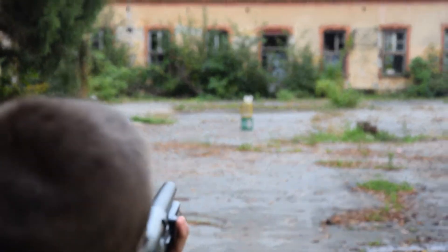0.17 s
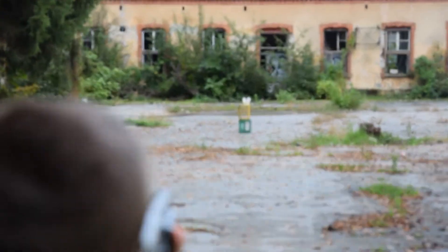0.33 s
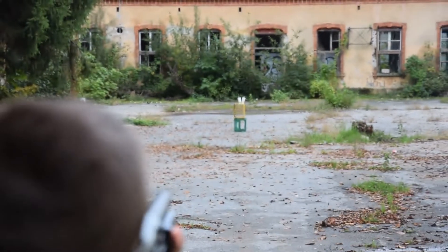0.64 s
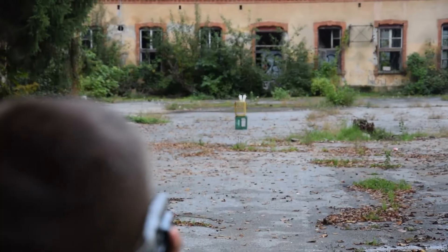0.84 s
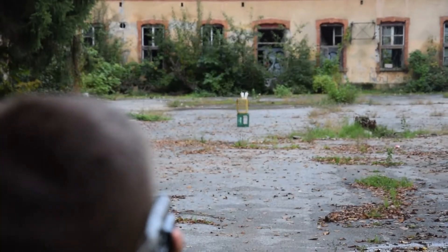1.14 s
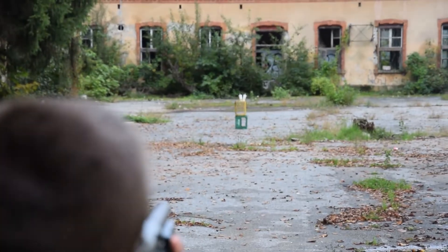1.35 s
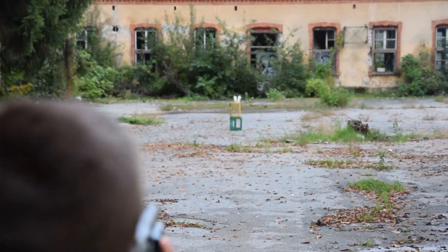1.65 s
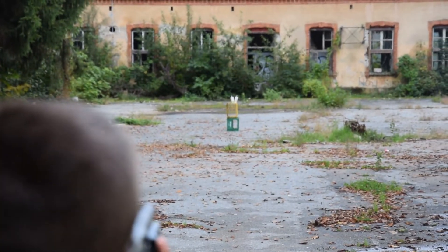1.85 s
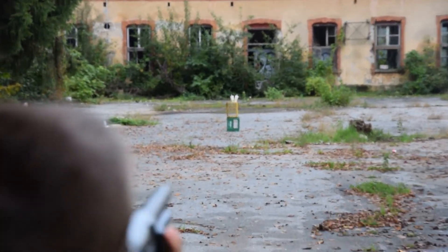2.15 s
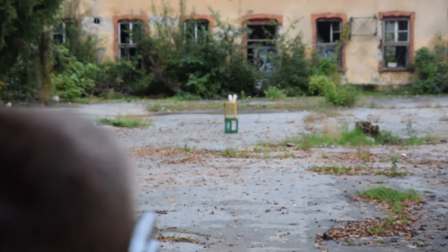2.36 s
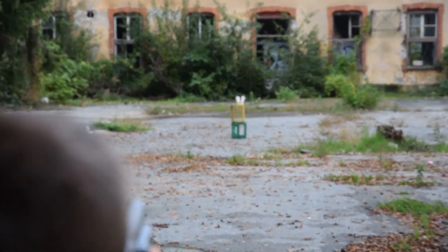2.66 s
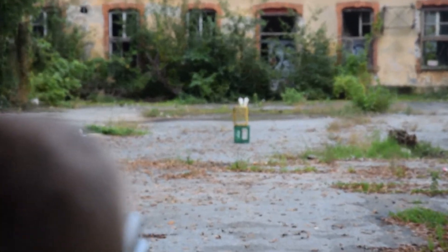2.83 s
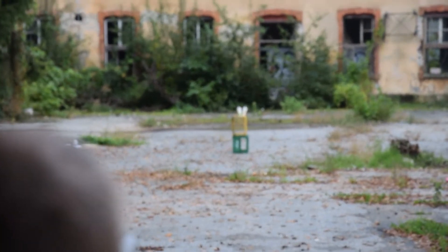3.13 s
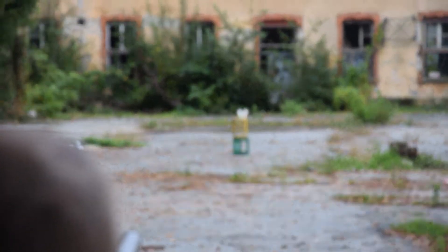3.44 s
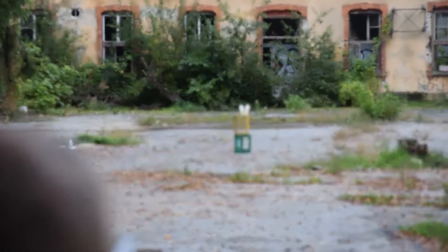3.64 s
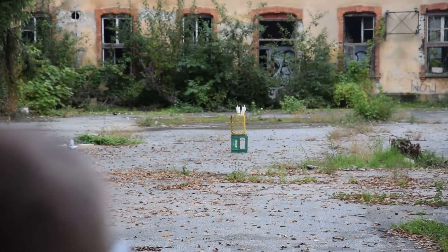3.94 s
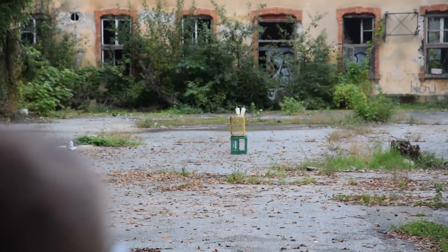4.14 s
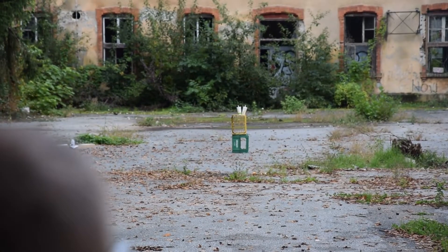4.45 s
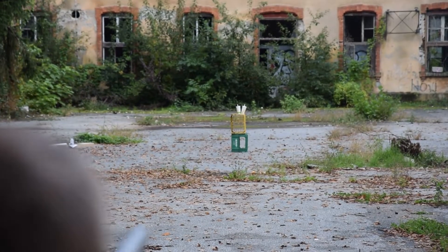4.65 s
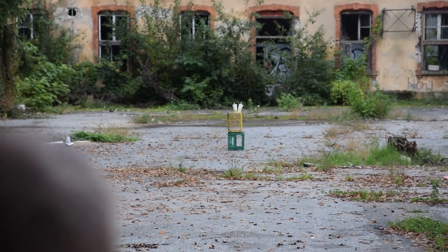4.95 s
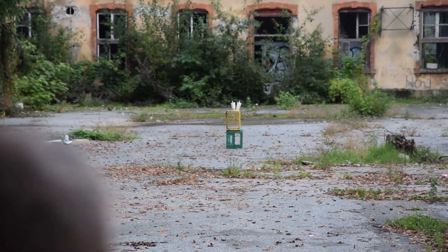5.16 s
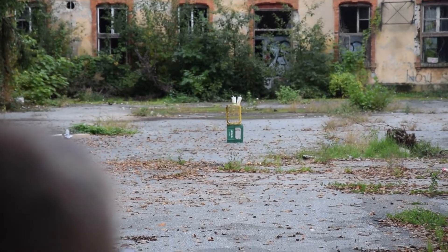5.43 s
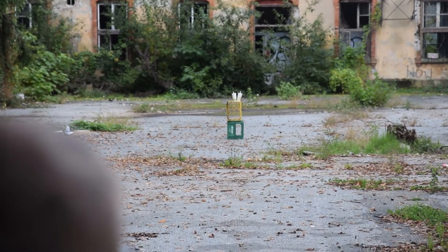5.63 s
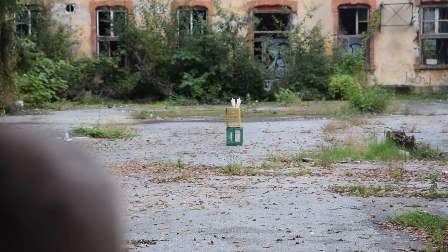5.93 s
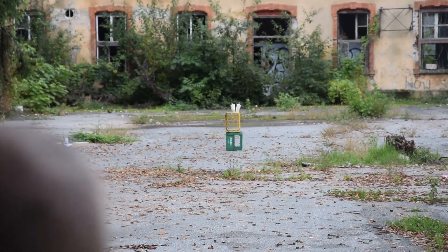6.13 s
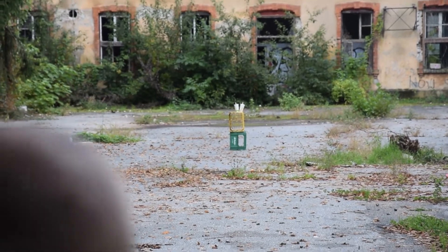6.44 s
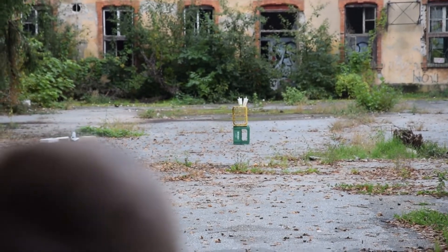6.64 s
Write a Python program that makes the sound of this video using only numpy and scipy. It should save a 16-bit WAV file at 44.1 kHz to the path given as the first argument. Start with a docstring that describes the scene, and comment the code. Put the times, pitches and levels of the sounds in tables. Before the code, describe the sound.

Close camera focus whirring and ticking, then a sharp air gun slam echoing off walls, slide racked back and forward, repeated to three shots.

```python
"""Spring shotgun in a walled yard

A spring airsoft shotgun fires three times in a paved yard between old buildings; its pump is racked twice.
Each shot is a short rush of filtered noise, then a slam of ringing body modes and noise bursts that overloads
the microphone and comes back off the walls. Racking is gritty noise bursts through the slide's resonances.
Dry and close, a focus motor whirrs and ticks through the lens barrel's resonances, over a faint wavering hum.
"""
import sys
import numpy as np
from scipy import signal
from scipy.fft import rfft, irfft
from scipy.io import wavfile

SR = 44100
rng = np.random.default_rng(int(sys.argv[2]) if len(sys.argv) > 2 else 0)


def int16_out(signal):
    """Quantize to a 16-bit WAV file."""
    q = np.round(np.clip(np.atleast_2d(signal).T, -1, 1) * 32767)
    wavfile.write(sys.argv[1], SR, q.astype(np.int16))


N = 299248
T = np.arange(N) / SR   # time in seconds

# Still air and microphone hiss, spectrum: pitch_hz, level_db (per Hz)
AIR_SPECTRUM = [(20, -13.5), (75, 0.5), (140, -3.5), (400, -7.5), (800, -10), (1400, -8), (2600, -17),
                (5000, -19.5), (6600, -20.5), (8500, -32.5), (11000, -41.5), (15000, -41)]
# Steady purr of the camera, resonances: pitch_hz, width_hz, level_db
PURR_MODES = [(201.2, 15, 3.5), (298.6, 16.6, 0.5), (3845, 304, -3), (4143, 106, -7.5), (5340, 200, -11),
              (6120, 290, -12.5)]
# Faint hum, resonances: pitch_hz, width_hz, level_db
HUM_MODES = [(557.3, 48, 4), (960, 190, -1)]
# How the hum wavers: time_s, level_db
HUM_WAVER = [(0, -48), (.58, -57.5), (.76, -48), (1.25, -53.5), (2.2, -53.5), (3.1, -99), (3.6, -52),
             (4.3, -65), (5.2, -48.5), (6.15, -53.5), (6.36, -49.5), (6.79, -57)]
# Diffuse sound of the yard: pitch_hz, level_db, t60_s
YARD_DECAY = [(99, -13.5, 1.02), (247, -12.5, 1.72), (500, 6, 0.66), (1000, -1.5, 0.96), (1960, 3, 1.116),
              (3900, 1.5, 0.83), (6780, 8, 0.62), (9900, 3, 0.44), (14900, 4.5, .36)]
# Echoes off the walls: delay_s, level_db, t60_s
WALL_ECHOES = [(0.1027, 2.5, .03), (.13, -0.5, 0.094), (.207, -10.5, 0.08), (0.294, -10.5, 0.32),
               (.44, -7, .13), (0.469, -9, 0.22)]
# Lens barrel, resonances: pitch_hz, width_hz, level_db
LENS_MODES = [(1060, 180, -20), (1750, 520, -8), (2720, 220, -9), (3310, 200, -2), (3687, 200, 11.5),
              (4000, 100, 14.5), (4070, 80, -17), (5190, 120, 3), (6230, 220, -3.5), (6930, 110, -3)]
# The lens moves: start_s, engage_s (gears), stop_s, running_db, stop_click_db, loss_db (per bounce);
# the last three are settings before trims and resonances
LENS_MOVES = [(-.006, .03, .124, -44, -19, 1), (.1717, .214, .3432, -40, -13, 7),
              (.4072, .4538, .5828, -42.5, -19.5, 0), (.6527, .683, .683, -43.5, -24.5, 14),
              (3.3307, 3.36, 3.4145, -43.5, -21.5, 0), (3.4748, 3.521, 3.6529, -44, -22, 7)]
# Single twitches of the lens: start_s, level_db, t60_s
LENS_TWITCHES = [(2.0718, -13, 0.0073), (3.8454, -23, 0.018), (3.853, -19.5, 0.043)]
# What the slide rings with: pitch_hz, width_hz, level_db
SLIDE_MODES = [(232, 66, -1), (367, 160, -2), (668, 56, 2.5), (780, 144, 11), (1097, 280, -3.5),
               (1497, 400, 7), (2220, 490, -0.5), (3180, 1050, -3), (4090, 270, -0.5), (4820, 180, -1.5),
               (5710, 571, 0), (6650, 350, 1), (7200, 380, -1)]
# The slide is pulled back: stop_s, travel_s, level_db
PULL_STROKES = [(2.1874, .061, -13), (4.6297, .0635, -13.5)]
# Met on the way back (latch, spring guide, sear, stop): share (of the travel), level_db, t60_s, treble_db
PULL_KNOCKS = [(0, -16.5, 0.018, 7.5), (.205, -5, .016, 3.5), (0.671, -4, 0.039, -14), (1, -1, 0.047, 0)]
# The slide is pushed home: stop_s, travel_s, level_db
PUSH_STROKES = [(2.5145, .083, -8.5), (4.9795, .095, -9.5)]
# Met on the way forward (play, feed, nozzle, seat, stop, rebound): share (of the travel), level_db, t60_s, treble_db
PUSH_KNOCKS = [(0, -25, 0.02, -4), (0.259, -23.5, 0.022, 6), (.585, -7, .018, -9.5), (.9, -14, 0.044, -3.5),
               (1, -1, .025, -3.5), (1.038, -5, 0.034, -4)]
# Hands shift their grip on the gun: start_s, level_db, t60_s, treble_db
GRIP_SHIFTS = [(2.014, -34, .025, -21), (2.0724, -18, 0.016, -19), (2.091, -37, 0.1, -16),
               (2.109, -33, 0.074, -16), (2.347, -34, 0.089, -14), (2.883, -41, 0.015, -18),
               (2.897, -29, 0.016, -34), (4.502, -29.5, 0.031, -29), (4.535, -35, 0.36, -16),
               (5.953, -35.5, 0.054, -14)]
# Shots: slam_s, travel_s (piston, before the slam), blast_db, crack_db, rattle_db (spring)
SHOT_EVENTS = [(1.353, 0.016, -3.5, -4.5, -25.5), (3.7143, 0.014, -5.5, -13.5, -28.5),
               (5.4153, 0.0079, -2, 1, -17.5)]
# Gun body, struck a little differently by each slam: pitch_hz, t60_s, first_db, second_db, third_db
BODY_MODES = [(218, 0.062, -8, -15, -16.5), (234, 0.058, 3, 2.5, -0.5), (252.6, 0.44, -19, -19.5, -33.5),
              (330, 0.1, -9, -20, -4.5), (464, 0.082, -6.5, -16.5, -8.5), (517, 0.1, -9, -17, -8),
              (676, 0.043, -2, -1, 5.5), (756, 0.043, -13, 0, -3), (879, 0.056, -11, -9, -4.5),
              (1122, 0.0347, -34, -3.5, -15.5), (1434, 0.039, -1.5, -5.5, -2.5),
              (1580, 0.0454, -3.5, -6.5, -26), (2107, 0.041, -16, -25, -3), (2401, 0.036, -29, -7, 0)]
# Air blast, spectrum: pitch_hz, level_db (per Hz)
BLAST_SPECTRUM = [(30, -66), (115, -4.5), (220, 0), (700, 2.5), (1050, -4.5), (1450, 4), (1900, -9),
                  (2300, -3), (3000, -17), (6000, -13), (15000, -50)]
# Plastic crack, spectrum: pitch_hz, level_db (per Hz)
CRACK_SPECTRUM = [(400, -11), (2200, -1), (3200, -2), (5000, -1), (6600, -0.5), (7700, -3), (9000, -15),
                  (12000, -27), (15500, -50)]
# Pop that the muzzle throws forward into the yard, spectrum: pitch_hz, level_db (per Hz)
MUZZLE_SPECTRUM = [(100, -27.5), (200, -1.5), (248, 13), (300, 1), (400, -6.5), (600, -5.5), (1000, -6),
                   (1500, 1), (2300, -5.5), (3100, -10.5), (6000, -17.5), (15000, -68.5)]

AIR_DB = -51
WHINE_HZ, WHINE_DB = 15735, -79   # camera electronics
PULL_RUB_DB, PUSH_RUB_DB = -22, -30.5   # sliding friction, against the stroke's level
START_DB, ENGAGE_DB, TICK_T60_S = 9.5, 17.5, 0.017   # motor start and gear ticks, against the running setting
RUN_EASE_DB_PER_S = 16   # the motor quietens as it nears focus
SURGE_AFTER_S, SURGE_DB = 0.02, 5.5   # after each of these ticks it speeds up through the barrel's resonance
BOUNCE_S, STOP_T60_S = 0.0045, 0.017   # the lens bounces at its stop
CUTOFF_HZ = 16400


def from_db(db):
    """Decibels to gain."""
    return 10 ** (np.asarray(db) / 20)


def noise():
    """White noise, rms 1."""
    return rng.standard_normal(N)


def fade(start, t60):
    """An envelope that jumps to 1 and dies away by 60 dB in t60 seconds."""
    return (T >= start) * np.exp(-np.log(1000) * np.clip((T - start) / t60, 0, 10))


def gate(start, end, edge=0.00076):
    """An envelope that is 1 between two times, with soft edges."""
    return np.clip((T - start) / edge, 0, 1) * np.clip((end - T) / edge, 0, 1)


def convolve(x, response):
    """Pass a sound through an impulse response."""
    return signal.fftconvolve(x, response)[:N]


def colour(x, spectrum, size=4096):
    """Causal (minimum-phase) filter with the given spectrum; white noise keeps its power."""
    hz, db = np.transpose(spectrum)
    grid = np.maximum(np.arange(size // 2 + 1) * SR / size, 1)
    gain = from_db(np.interp(np.log(grid), np.log(hz), db))
    cepstrum = irfft(np.log(gain))
    # doubling the positive-time half of the cepstrum makes the phase minimal
    causal = 2 * cepstrum[:size // 2] * (np.arange(size // 2) > 0)
    response = irfft(np.exp(rfft(causal, size)))
    return convolve(x, response / np.linalg.norm(response))


def resonate(x, modes, size=8192):
    """Parallel decaying resonances; a wider one dies sooner; white noise keeps its power."""
    t = T[:size]
    response = np.zeros(size)
    for hz, width, db in modes:
        response += from_db(db) * width * np.exp(-np.pi * width * t) * np.cos(2 * np.pi * hz * t)
    return convolve(x, response / np.linalg.norm(response))


def drone(modes):
    """Noise twice through the same resonances, so that the valleys stay dark; rms 1."""
    x = resonate(resonate(noise(), modes), modes)
    return x / x.std()


def cut(x, hz, kind, order=2):
    """Butterworth filter."""
    return signal.sosfilt(signal.butter(order, hz, kind, fs=SR, output="sos"), x)


def background(purr_db=-55):
    """Still air is shaped noise, hum and purr are resonant noise, the electronics whine is a sine."""
    air = from_db(AIR_DB) * colour(noise(), AIR_SPECTRUM)
    hum = from_db(np.interp(T, *np.transpose(HUM_WAVER))) * drone(HUM_MODES)
    purr = from_db(purr_db) * drone(PURR_MODES)
    whine = from_db(WHINE_DB) * np.sin(2 * np.pi * WHINE_HZ * T)
    return air + hum + purr + whine


def yard(x, build_s=0.0076, lump_db=3.0):
    """Scatter from the ground and the bushes arrives in clumps and dies band by band."""
    hz, db, t60 = np.transpose(YARD_DECAY)
    t = T[:2 * SR]
    response = np.zeros(2 * SR)
    edges = np.geomspace(60, 17000, 15)
    for low, high in zip(edges, edges[1:]):
        centre = np.log(low * high) / 2   # log of the band's middle frequency
        level = np.interp(centre, np.log(hz), db)
        decay = np.interp(centre, np.log(hz), t60)
        band = cut(noise()[:2 * SR], [low, high], "band")
        response += band * from_db(level - 60 * t / decay)
    lumps = from_db(lump_db * np.interp(t, T[::128], noise()[::128]))
    build = np.minimum(t / build_s, 1)
    return convolve(x, response * lumps * build / np.sqrt(SR))


def walls(x, nearest_top_hz=4500):
    """Each facade sends back a smeared echo, the duller the farther it stands."""
    response = np.zeros(N)
    for delay, db, t60 in WALL_ECHOES:
        top_hz = nearest_top_hz * WALL_ECHOES[0][0] / delay
        smear = from_db(db) * fade(delay, t60) * noise()
        response += cut(smear, top_hz, "low", order=1)
    return convolve(x, response[:SR] / np.sqrt(SR))


def focus_ticks(count=3, stop_gain_db=-1.0):
    """Moves tick at the start and as gears engage, then bounce at the stop: rows start_s, level_db, t60_s."""
    ticks = list(LENS_TWITCHES)
    for start, engage, stop, run_db, stop_db, loss_db in LENS_MOVES:
        ticks.append((start, run_db + START_DB, TICK_T60_S))
        ticks.append((engage, run_db + ENGAGE_DB, TICK_T60_S))
        for bounce in range(count):
            bounce_db = stop_db + stop_gain_db - bounce * loss_db
            ticks.append((stop + bounce * BOUNCE_S, bounce_db, STOP_T60_S))
    return [tick for tick in ticks if tick[0] >= 0]


def focus_effort(surge_s=0.009, running_trim_db=-0.5):
    """The motor eases off through each move, surging after the start and again once the gears engage."""
    effort = np.zeros(N)
    for start, engage, stop, run_db, stop_db, loss_db in LENS_MOVES:
        running = from_db(running_trim_db - RUN_EASE_DB_PER_S * np.maximum(T - engage, 0))
        surging = np.zeros(N)
        for tick in (start, engage):
            distance = (T - tick - SURGE_AFTER_S) / surge_s
            surging += from_db(SURGE_DB) / (1 + distance ** 2) ** 2
        effort += from_db(run_db) * gate(start, stop) * (running + surging)
    return effort


def focus_motor(teeth_hz=330, mesh=0.57, knock_db=13.0, chatter_db=-2.5,
                rasp_top_hz=8200, click_top_hz=9000, bottom_hz=700):
    """Gear teeth rasp as the lens moves; ticks add a knock and a chatter; all of it rings the barrel."""
    teeth = 1 + mesh * np.sin(2 * np.pi * teeth_hz * T)
    rasp = focus_effort() * teeth * noise()
    chatter, knocks = np.zeros((2, N))
    for s, db, t60 in focus_ticks():
        knocks[round(s * SR)] += from_db(db + knock_db)
        chatter += from_db(db + chatter_db) * fade(s, t60)
    rattling = chatter * np.sign(noise())   # harsh two-level noise
    grinding = cut(rasp + rattling, rasp_top_hz, "low", order=5)
    clicks = cut(knocks, click_top_hz, "low", order=4)
    return cut(resonate(grinding + clicks, LENS_MODES), bottom_hz, "high")


def slide_action(strokes, contacts, rub_db):
    """Each stroke rubs along its travel and meets the same parts in turn; gives knocks and friction level."""
    knocks = []
    rub = np.zeros(N)
    for stop, travel, db in strokes:
        for share, contact_db, t60, treble_db in contacts:
            knocks.append((stop - (1 - share) * travel, db + contact_db, t60, treble_db))
        rub += from_db(db + rub_db) * gate(stop - travel, stop)
    return knocks, rub


def pump(split_hz=2800, top_hz=8300, bottom_hz=150, grain_db=-2.0):
    """Plastic parts rub and knock; every contact is a short gritty burst into the slide's resonances."""
    back, back_rub = slide_action(PULL_STROKES, PULL_KNOCKS, PULL_RUB_DB)
    home, home_rub = slide_action(PUSH_STROKES, PUSH_KNOCKS, PUSH_RUB_DB)
    rub = back_rub + home_rub
    dull, bright = np.zeros((2, N))
    for s, db, t60, treble_db in back + home + list(GRIP_SHIFTS):
        envelope = fade(s, t60)
        dull += from_db(db) * envelope
        bright += from_db(db + treble_db) * envelope
    # noise whose level wanders at random, so it sounds grainy
    grain = from_db(grain_db * np.interp(T, T[::32], noise()[::32]))
    grit = noise() * grain
    grit = grit / grit.std()
    low_force = cut(grit * (dull + rub), split_hz, "low", order=1)
    high_force = cut(grit * (bright + rub), split_hz, "high", order=1)
    ringing = resonate(low_force + high_force, SLIDE_MODES)
    return cut(cut(ringing, top_hz, "low", order=4), bottom_hz, "high")


def muzzle(pop_db=23, snap_db=15):
    """One sharp pulse of air a shot, aimed away from the microphone and heard only as it comes back."""
    pop, snap = np.zeros((2, N))
    for s, travel, blast_db, crack_db, rattle_db in SHOT_EVENTS:
        pop[round(s * SR)] = from_db(pop_db + blast_db)
        snap[round(s * SR)] = from_db(snap_db + crack_db)
    return colour(pop, MUZZLE_SPECTRUM) + colour(snap, CRACK_SPECTRUM)


def shots(rush_db=-19, rush_rise_s=0.026, rush_top_hz=6000, scrape_db=-7.5, blast_t60=0.046,
          crack_t60=0.032, rattle_t60=0.272, swell_s=0.00085, bottom_hz=170):
    """The piston speeds forward and slams: the body rings, air bursts out, the spring rattles."""
    thump, blast, crack, rush = np.zeros((4, N))
    age = T[:SR]
    swell = 1 - np.exp(-age / swell_s)   # air cushions the piston, so the blow builds briefly
    for shot, (s, travel, blast_db, crack_db, rattle_db) in enumerate(SHOT_EVENTS):
        at = round(s * SR)
        phases = rng.uniform(0, 2 * np.pi, len(BODY_MODES))
        for (hz, t60, *strength_db), phase in zip(BODY_MODES, phases):
            ring = np.sin(2 * np.pi * hz * age + phase) * np.exp(-np.log(1000) * age / t60)
            thump[at:at + SR] += from_db(strength_db[shot]) * swell * ring
        rush += from_db(rush_db) * gate(s - travel, s) * np.exp(-abs(T - s) / rush_rise_s)
        blast += from_db(blast_db) * fade(s, blast_t60)
        crack += from_db(crack_db) * fade(s, crack_t60)
        crack += from_db(rattle_db) * fade(s, rattle_t60)   # the spring rattles on, in the crack's colour
    scrape = from_db(scrape_db) * cut(rush * noise(), rush_top_hz, "low", order=4)
    body = cut(thump, bottom_hz, "high")   # the body's ringing carries little deep bass
    air = colour((blast + rush) * noise(), BLAST_SPECTRUM)
    plastic = colour(crack * noise() + scrape, CRACK_SPECTRUM)
    return body + air + plastic


def scene(shot_yard_db=-8, pump_yard_db=-1.5, side_echo_db=-6):
    """The gun sounds into the yard, its muzzle toward the walls; the lens is heard through the camera body."""
    fire, rack, forward = shots(), pump(), muzzle()
    around = from_db(shot_yard_db) * fire + from_db(pump_yard_db) * rack
    outdoors = yard(forward + around) + walls(forward + from_db(side_echo_db) * around)
    return (fire + rack + outdoors + focus_motor() + background())[None]


def record(dry, ceiling=0.86, bottom_hz=25):
    """The shots overload the input, which squashes the peaks; the very bottom and the top are cut."""
    clipped = dry / (1 + (dry / ceiling) ** 8) ** (1 / 8)
    low_pass = signal.cheby2(14, 60, CUTOFF_HZ + 600, fs=SR, output="sos")
    return signal.sosfilt(low_pass, cut(clipped, bottom_hz, "high", order=1))


dry = scene()
out = record(dry)
int16_out(out)
```